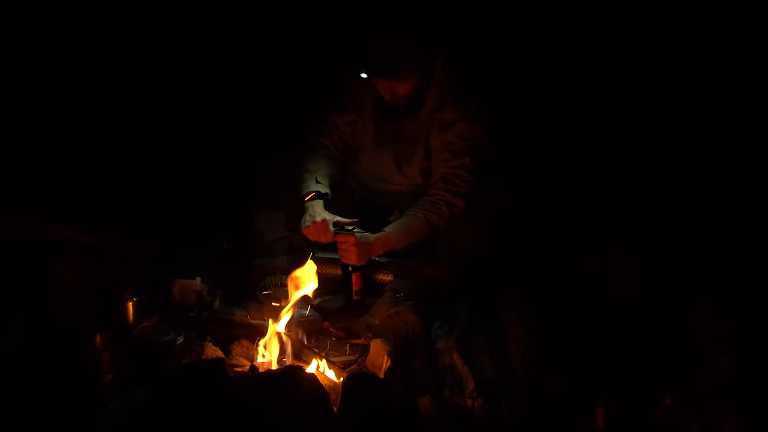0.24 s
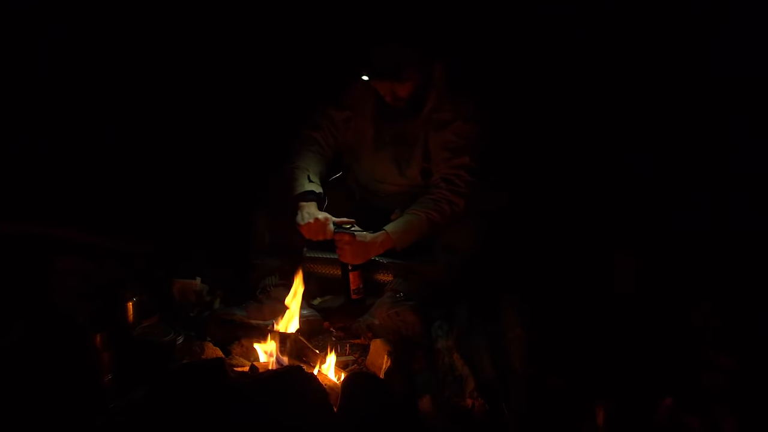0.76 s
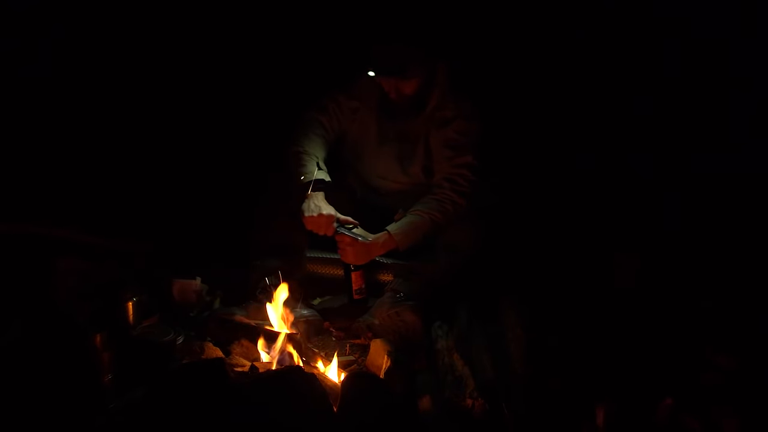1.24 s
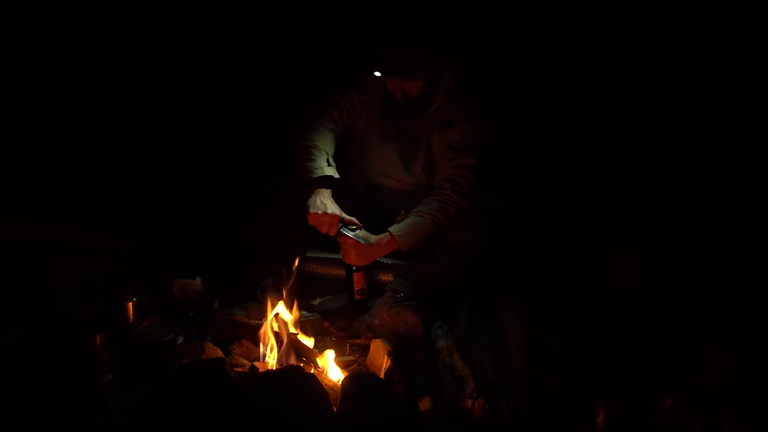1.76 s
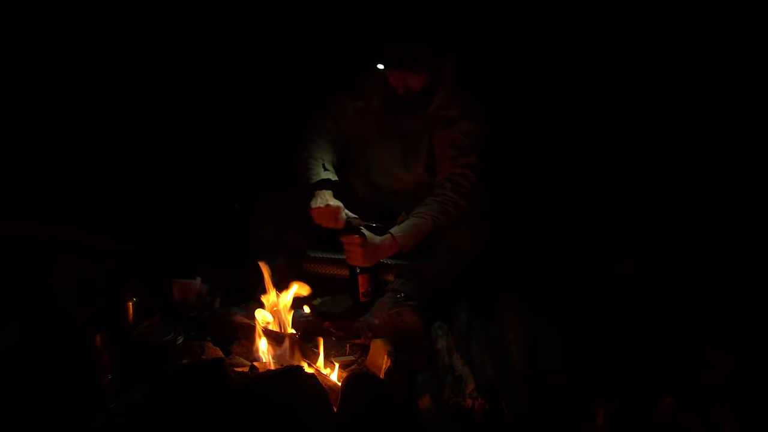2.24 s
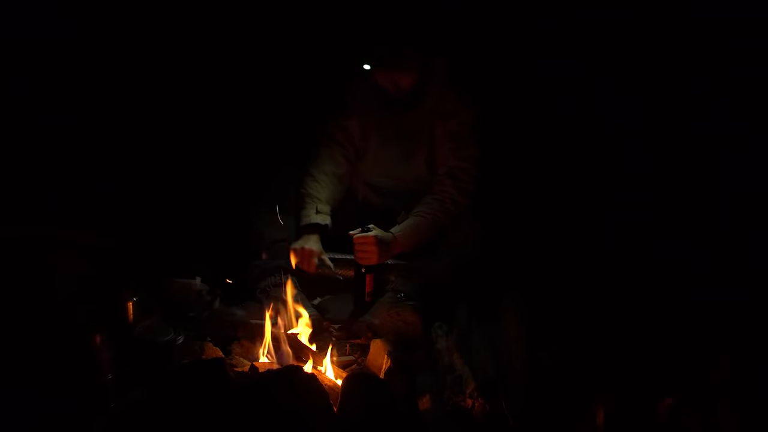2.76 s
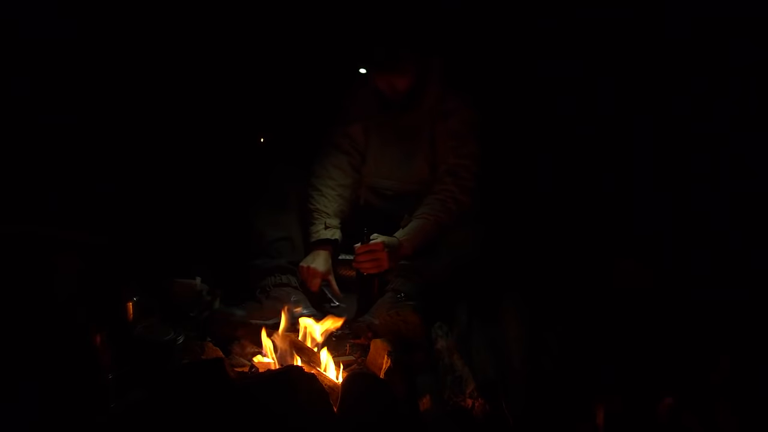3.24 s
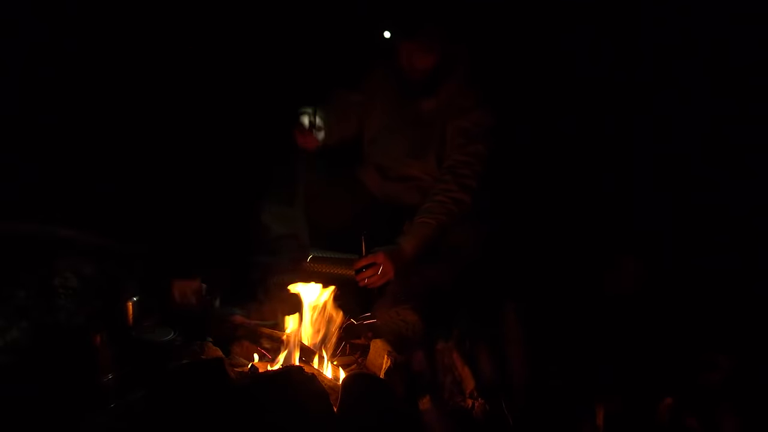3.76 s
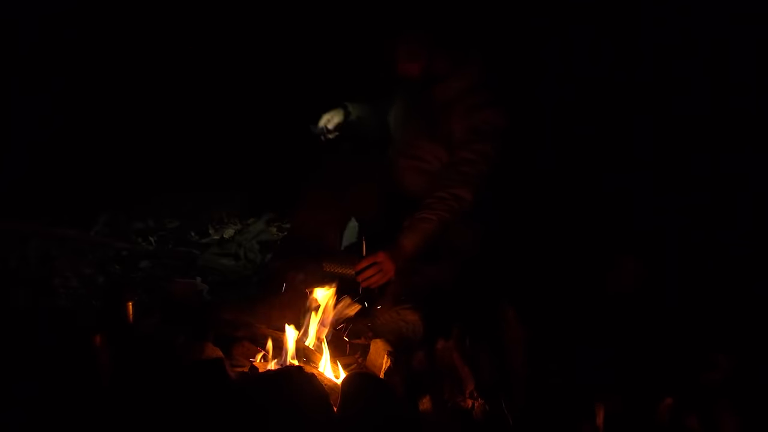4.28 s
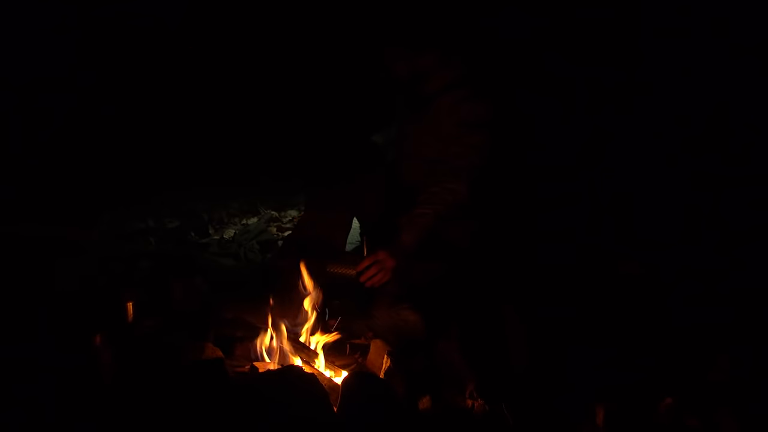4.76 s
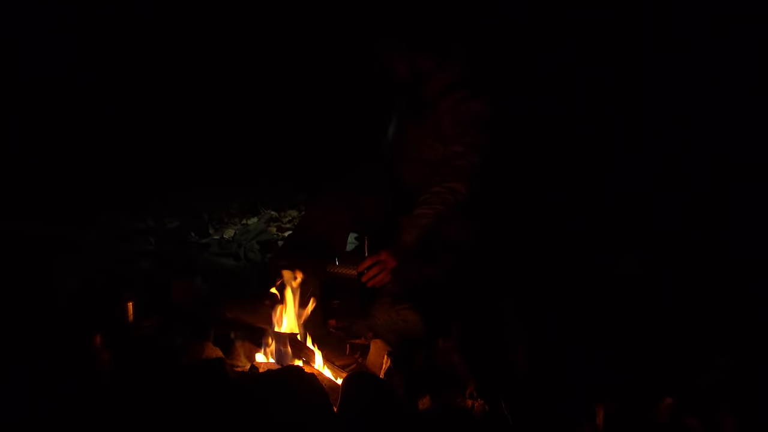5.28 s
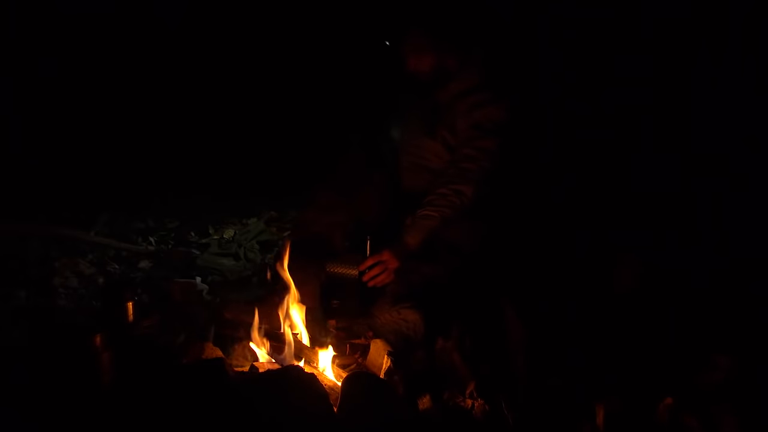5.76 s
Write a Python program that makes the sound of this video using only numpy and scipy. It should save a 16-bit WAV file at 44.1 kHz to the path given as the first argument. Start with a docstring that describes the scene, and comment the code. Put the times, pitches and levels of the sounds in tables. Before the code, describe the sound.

Two sharp metal-on-glass clinks, a quick spit of gas, a loud cap pop and a light metallic scatter of bounces. Fire ticks and hisses throughout, with dry snaps, one explosively loud after four seconds. Cloth rustles in the middle, then a burst of woody knocks and dragging ends the action. Dry open air at night, little echo, low wind buffeting the close small microphone.

```python
"""A campfire at night: a steel tool knocks and pries at a bottle cap, gas hisses, the cap pops off and bounces.
The fire snaps, a stick knocks and drags over wood, a jacket rustles, breeze rumbles on a small microphone.
Blows are a sharp front and short noise, most with decaying modes of what is struck.
Gas, cloth and the fire's hiss are coloured noise with wandering level; near echoes follow the blows,
and the loudest peaks clip."""
import sys
import numpy as np
from scipy import signal
from scipy.fft import rfft, irfft, next_fast_len
from scipy.io import wavfile
from scipy.ndimage import uniform_filter1d

SR = 44100
rng = np.random.default_rng(int(sys.argv[2]) if len(sys.argv) > 2 else 0)


def natural_amplitude(level_db):
    """Convert a level in decibels to a linear amplitude factor, elementwise."""
    exponent = np.asarray(level_db, float) / 20
    return 10 ** exponent


def master(y):
    """Save y as 16-bit WAV."""
    cut = np.clip(np.atleast_2d(y).T, -1, 1)
    pcm = np.round(cut * 32767)  # scale
    wavfile.write(sys.argv[1], SR, pcm.astype(np.int16))


N = 265261
T = np.arange(N) / SR
SPAN = 1 << 15  # samples in one blow


def shape(table, size, tilt_db=0.):
    """Spectral envelope: gain per FFT bin from (Hz, dB) points, tilted in dB per octave about 3 kHz."""
    hz, db = np.transpose(table)
    octave = np.log2(np.maximum(np.fft.rfftfreq(size, 1 / SR), 10))
    tilt = tilt_db * (np.clip(octave, 7, 14) - np.log2(3000))
    return natural_amplitude(np.interp(octave, np.log2(hz), db) + tilt)


def noise(table, tilt_db=0.):
    """Filtering of white noise: coloured noise of rms 1."""
    size = next_fast_len(N)
    spectrum = rfft(rng.standard_normal(size)) * shape(table, size, tilt_db)
    x = irfft(spectrum, size)[:N]
    return x / x.std()


def walk(rate):
    """Random modulation: levels held 1 / rate s and slewed twice, with a spread near 1."""
    hold = int(SR / rate)
    steps = np.repeat(rng.standard_normal(N // hold + 1), hold)
    return 1.57 * uniform_filter1d(uniform_filter1d(steps, hold), hold)[:N]


def curve(rows, edge=0.057):
    """Amplitude envelope: gain over time from (s, dB) rows, faded out over edge seconds beyond them."""
    s, db = np.transpose(rows)
    fade = np.clip(np.minimum(T - s[0], s[-1] - T) / edge + 1, 0, 1)
    return fade * natural_amplitude(np.interp(T, s, db))


def arch(hz, centre, curve_db, low_share=0.52):
    """Parabolic resonance curve: loss in dB about a centre in octaves over 1 kHz, scaled by low_share below it."""
    octaves_off = np.log2(np.maximum(hz, 20) / 1000) - centre
    return -np.abs(curve_db) * octaves_off ** 2 * np.where(octaves_off < 0, low_share, 1)


def causal(gain):
    """Causality: the minimum-phase spectrum of a gain, so nothing sounds before the blow."""
    cepstrum = irfft(np.log(gain))
    half = len(cepstrum) // 2
    cepstrum[1:half] *= 2
    cepstrum[half + 1:] = 0
    return np.exp(rfft(cepstrum))


def ring(modes, centre, curve_db):
    """Modal superposition: one impulse starts decaying sines; the spot struck favours those near the centre."""
    hz, db, t60 = np.array(modes).T[:, :, None]
    t = np.arange(SPAN) / SR
    envelope = natural_amplitude(db + arch(hz, centre, curve_db) - 60 * t / t60)
    return np.sum(envelope * np.sin(2 * np.pi * hz * t), axis=0)


# Colour of a bare crack. Each row: frequency in Hz, gain in dB before any tilt or arch.
CRACK_COLOUR = [(200, 11), (700, 7), (1500, 0), (3000, 3.5), (5500, 2.5), (8000, 9), (10000, -2.5),
                (12500, 0.5), (16000, -4)]


def blows(events, bodies, first_db, crack_curve_db, ring_curve_db, low_share, landing=False):
    """Impact excitation: a sharp front and a dying chatter, plus the modes of what is struck.
    Each event: s, dB, crack T60 s, crack centre in octaves over 1 kHz, a ring dB per body, ring centre."""
    out = np.zeros(N + SPAN)
    t, hz = np.arange(4096) / SR, np.fft.rfftfreq(SPAN, 1 / SR)
    chatter = rng.standard_normal((len(events), len(t)))
    for (s, db, t60, centre, *ring_levels, ring_centre), grains in zip(events, chatter):
        push = grains * natural_amplitude(-60 * (t / max(t60, .003)) ** 1.04)  # at most 93 ms of noise
        push[0] = -natural_amplitude(first_db)
        loss_db = arch(hz, centre, crack_curve_db, max(low_share, 0))
        colour = shape(CRACK_COLOUR, SPAN) * natural_amplitude(np.maximum(loss_db, -80))
        crack = irfft(rfft(push, SPAN) * causal(colour))
        crack = crack / np.linalg.norm(crack[:200]) * 4
        body = sum(natural_amplitude(level) * ring(modes, ring_centre, ring_curve_db)
                   for level, modes in zip(ring_levels, bodies))
        later = [event[0] - s for event in events if event[0] > s + .015]
        if landing and later:  # a landing over 15 ms on stills the ring, at 3000 dB per s
            body *= natural_amplitude(-3000 * np.maximum(np.arange(SPAN) / SR - later[0], 0))
        start = int(s * SR)
        out[start:start + SPAN] += natural_amplitude(db) * (crack - body)
    return out[:N]


# Tool on cap and glass; a loose grip lets the tool ring. Each row: start in seconds, blow level in dB,
# crack T60 in seconds, tool ring in dB against the blow level, spot struck (ring centre in octaves over 1 kHz).
PRIES = [(.103, -37, 0.012, -33, 2.6), (.1128, -9, .045, -23, 2.8), (0.3553, -31.5, 0.019, -28, 1.2),
         (0.7386, -3, .006, -19.5, 1.67), (.756, -29, .02, -5, 1), (.874, -36, .015, -20, 2.1),
         (.9185, -32, .017, -10, 2.2), (1.108, -31.5, 0.037, -15, 1.2), (1.967, -34, .03, -32, 3)]
# Modes of the steel tool and of the glass bottle. Each row: frequency in Hz, level in dB
# before the spot struck weights it, T60 in seconds.
TOOL_MODES = [(2331, -7, .5), (4127, -10, .3), (5280, -22, .12), (6055, -26, .15), (7857, -17, .1)]
BOTTLE_MODES = [(1530, 7, 0.025), (2737, 3, 0.022), (3140, -8.5, 0.033), (3586, -0.5, 0.023),
                (5235, -3.5, 0.021), (6953, -4, 0.029), (7730, -13, .05)]
# The cap lets go: first row the rim tearing free, second the air in the neck. Each row: start in seconds,
# blow level in dB, crack T60 in seconds, crack centre in octaves over 1 kHz, ring in dB against the blow level.
RELEASE = [(1.9704, 10.5, 0.032, 1.37, -16.5), (1.9702, -5, .0067, .013, 0.5)]
# Modes of the air in the neck, rim and freed cap. Each row: frequency in Hz, level in dB
# before the ring centre weights it, T60 in seconds.
NECK_MODES = [(1238, 0, .095), (6050, -24, .25), (6955, -7, .045), (7857, -7, .12), (8890, -17, .1),
              (9285, -14, .08), (11400, -17, .06), (12700, -11, .06)]


def opening():
    """Impact and release: the tool pries, the rim tears free and jolts the tool, the neck pops, the cap chatters."""
    crack_oct, bottle_db = 1.26, -8  # octaves over 1 kHz; dB against the blow level
    pries = [(s, db, t60, crack_oct, tool_db, bottle_db, spot) for s, db, t60, tool_db, spot in PRIES]
    tear, pop = [[(*row, .3)] for row in RELEASE]  # ring centre .3 octaves over 1 kHz
    rattle = [(1.985, -13, 0.23, 1.8, 0)]  # chatter along the rim: a noise burst without modes
    out = blows(pries, [TOOL_MODES, BOTTLE_MODES], first_db=8.0, crack_curve_db=4.6,
                ring_curve_db=5, low_share=0.8)
    out += blows(tear, [TOOL_MODES], first_db=1.3, crack_curve_db=2.2, ring_curve_db=3.5, low_share=1.0)
    out += blows(pop, [NECK_MODES], first_db=6, crack_curve_db=4.6, ring_curve_db=0.033, low_share=0.3)
    return out + blows(rattle, [], first_db=-1, crack_curve_db=4.3, ring_curve_db=0, low_share=0.59)


# Spectrum of the escaping gas. Each row: frequency in Hz, relative spectral level in dB before any tilt.
JET = [(880, -44), (1500, -22), (2220, -24), (2520, -8.5), (3480, -16), (4760, -10), (5190, -6),
       (5670, -9.5), (7910, -0.5), (8390, 5.5), (9160, -2), (12400, 3), (15500, -3)]


def gas():
    """Turbulent jet: bright and sputtering, it builds once the rim lifts and dies as the pressure drops."""
    opens_s, peak_s, peak_db = 1.044, 1.1606, -19.5  # peak before the sputter
    rise_db_per_s, fall_db_per_s = 183, 160
    bright = noise(JET) * natural_amplitude(1.1 * walk(59.8) + 1.8 * walk(460))
    dull = natural_amplitude(-8) * noise(JET, -1.8)
    loss_db = np.maximum(rise_db_per_s * (peak_s - T), fall_db_per_s * (T - peak_s))
    lifted = np.clip((T - opens_s) / 0.0089 + 1, 0, 1)  # fully open at opens_s
    return lifted * natural_amplitude(peak_db - loss_db) * (bright + dull)


# Loose cap on stones. Each row: start in seconds, blow level in dB, crack T60 in seconds,
# ring in dB against the blow level, part struck (ring centre in octaves over 1 kHz).
BOUNCES = [(2.028, -26, .008, -40, 2.5), (2.057, -10.5, 0.016, -33, 3.2), (2.0665, -11, .015, -16.5, 3.7),
           (2.072, -13, 0.011, -10, 2.3), (2.099, -10.5, 0.036, -36, 2.2), (2.103, -25, .02, -32, 3.55),
           (2.1475, -25, .02, -23, 3.4), (2.155, -22.5, 0.012, -30, 3), (2.204, -34, .03, -30, 2.7),
           (2.2328, -12.5, .008, -22, 2.9), (2.375, -35, .02, -22, 2.5)]
# Modes of the cap. Each row: frequency in Hz, level in dB before the part struck weights it,
# T60 in seconds while no landing stills it.
CAP_MODES = [(4680, -2, .1), (6270, 11, .0081), (7740, -3, .08), (7870, 1, .09), (11400, -4, .06),
             (12000, -9, .07), (13600, -1, .1)]


def cap():
    """Contact damping: the loose cap bounces, and landings still the ring of earlier ones."""
    crack_oct = 2.39  # over 1 kHz
    rows = [(s, db, t60, crack_oct, ring_db, part) for s, db, t60, ring_db, part in BOUNCES]
    return blows(rows, [CAP_MODES], first_db=4.1, crack_curve_db=4.7, ring_curve_db=30,
                 low_share=0.52, landing=True)


# Burning wood snaps. Each row: start in seconds, blow level in dB, crack T60 in seconds,
# crack centre in octaves over 1 kHz.
SNAPS = [(0.179, -36, 0.021, 2), (1.3445, -37, .022, 6), (1.362, -26.5, 0.018, 1.5),
         (1.3947, -3.5, 0.0044, 2), (1.51, -8.5, 0.0092, 3), (1.768, -22, 0.024, 5),
         (1.781, -32, 0.0086, 2), (2.615, -19.5, .02, 2.5), (2.89, -27, .022, 13), (3.2933, -36, 0.025, 9),
         (3.438, -3, 0.0086, 0.18), (3.657, -31, 0.043, -3), (3.7012, -5, 0.009, 2.5),
         (4.199, 10.5, 0.011, 2), (4.211, -7, 0.094, 5.5), (4.447, -24.5, .017, 0),
         (4.575, -21.5, 0.018, 14), (4.686, -25, 0.02, 7.5), (5.0947, -33.5, .012, 3.5)]
# Modes of the log. Each row: frequency in Hz, level in dB before the ring centre weights it, T60 in seconds.
LOG_MODES = [(120, -14, .04), (270, -7, .03), (745, -2, 0.013), (1327, 1.5, 0.012), (1480, -5, 0.013),
             (2420, -6, 0.012), (3760, -12, .0067), (5530, 4, .01), (6560, -13, .02), (8200, 4, .012)]


def snaps():
    """Sudden fracture: snaps ring the log; dull ones come from thick wood and ring it more."""
    ring_db, ring_db_per_oct, ring_oct = -8.5, -3.5, 0.8
    rows = [(s, db, t60, centre, ring_db + ring_db_per_oct * max(centre, 0), ring_oct)
            for s, db, t60, centre in SNAPS]
    return blows(rows, [LOG_MODES], first_db=15.8, crack_curve_db=2.05, ring_curve_db=13.0, low_share=0.22)


# Stick knocks. Each row: start in seconds, blow level in dB, crack T60 in seconds,
# spot struck (ring centre in octaves over 1 kHz).
KNOCKS = [(5.209, -14.5, 0.06, -1.1), (5.2838, -25, 0.035, 1), (5.311, -25.5, 0.024, 1.2),
          (5.349, -27.5, 0.14, 1.6), (5.40, -25, 0.069, 1.7), (5.426, -34, .02, 4),
          (5.4638, -11, 0.091, -0.63), (5.5325, -13, 0.0057, 0.2), (5.539, -13.5, 0.01, 1.76),
          (5.5835, -17, .014, 0.8), (5.589, -16, 0.072, -0.06), (5.6115, -16.5, 0.014, 1.2),
          (5.62, -14, 0.066, 0.1), (5.635, -5, 0.028, 1.04), (5.643, -14, .09, 0.5), (5.69, -29, .04, 5),
          (5.721, -23.5, 0.16, -1)]
# Modes of the stick. Each row: frequency in Hz, level in dB before the ring centre weights it, T60 in seconds.
STICK_MODES = [(420, 6, 0.01), (556, -63, 0.021), (720, -17, 0.15), (804, 2, 0.062), (1050, 4, 0.0073),
               (1465, 1, 0.04), (2503, 0, 0.032), (2930, -9, .035), (3210, -6, 0.039), (3700, -14, .03)]


def knocks():
    """Modal selection by strike position: the spot struck sets both the crack and the ring of the stick."""
    crack_oct, follow, ring_db = 0.28, 0.74, -1.5  # the crack centre follows the spot in part
    rows = [(s, db, t60, crack_oct + follow * spot, ring_db, spot) for s, db, t60, spot in KNOCKS]
    return blows(rows, [STICK_MODES], first_db=13.0, crack_curve_db=2.43, ring_curve_db=48.0, low_share=0.65)


# Stick dragged over wood. Each row: time in seconds, level in dB before the grains and ring scale it.
DRAG = [(5.26, -49.5), (5.32, -40), (5.42, -41), (5.5, -47), (5.61, -37.5), (5.72, -39.5), (5.77, -47)]


def drag():
    """Stick-slip friction: grains ring the stick over a hiss; the ring fades as the grip tightens."""
    grains = rng.standard_normal(N) * natural_amplitude(5.1 * walk(90) + 1.7 * walk(600))
    rung = signal.fftconvolve(grains, ring(STICK_MODES, 1.0, 0.95))[:N]
    ring_gain = natural_amplitude(6.5 - 22 * np.maximum(T - DRAG[0][0], 0))  # dB at the start, dB per s
    hiss = noise(CRACK_COLOUR, -2.16) * natural_amplitude(3.7 * walk(140))
    return curve(DRAG) * (ring_gain * rung / rung.std() + hiss)


def swell(s, db, rise_s, fall_s):
    """Gaussian envelope: a rounded rise and fall, 24 dB down a rise before and a fall after its peak."""
    reach = (T - s) / np.where(T < s, rise_s, fall_s)
    return natural_amplitude(db + np.maximum(-24 * reach ** 2, -120))


# Jacket moving. Each row: loudest moment in seconds, level in dB before the flutter,
# rise in seconds, fall in seconds, brightness from 0 to 1.
RUSTLE = [(.57, -50.5, 0.64, 0.24, 0.7), (2.9, -39, 0.43, 0.48, 0.62), (3.51, -45, 0.045, .05, 0.63),
          (4.09, -42.5, 0.14, 0.28, 0.94), (4.24, -40, 0.024, 0.16, 0.56), (4.45, -36.5, 0.24, 0.27, 0.7),
          (5.9, -52, 0.19, 0.35, 0.65)]
# Spectrum of the cloth. Each row: frequency in Hz, relative spectral level in dB before the tilt.
CLOTH = [(240, -41), (400, -8), (928, 0.5), (1560, 0), (1790, -6), (2510, -2), (4850, -8), (5830, -11),
         (7110, -10.5), (8160, -9), (9960, -27.5), (12700, -20), (15500, -30)]
# Spectrum of the sleeve's swish. Each row: frequency in Hz, relative spectral level in dB.
SWISH_BAND = [(6000, -38), (7300, -32), (8100, 10), (8800, -1), (10000, -35)]


def jacket():
    """Dense fabric friction: each move mixes dull and bright noise; a sliding sleeve gives a thin swish."""
    dull, bright = noise(CLOTH, -7.0), noise(CLOTH, 2.9)
    out = swell(4.495, -38, rise_s=0.069, fall_s=0.061) * noise(SWISH_BAND)
    for *move, brightness in RUSTLE:
        angle = np.pi / 2 * np.clip(brightness, 0, 1)
        out = out + swell(*move) * (dull * np.cos(angle) + bright * np.sin(angle))
    return out * natural_amplitude(0.4 * walk(60) + 1.1 * walk(430))


# Soft dull taps on the ground. Each row: start in seconds, blow level in dB, crack T60 in seconds,
# crack centre in octaves over 1 kHz.
TAPS = [(1.713, -23.5, 0.02, -0.63), (2.149, -19.5, 0.016, 0.39), (3.2056, -19.5, 0.024, -0.9),
        (3.353, -27, .015, -0.66), (3.45, -36, 0.016, -0.58)]


def taps():
    """Heavily damped impact: short muffled bumps without a ring."""
    rows = [(*row, 0) for row in TAPS]
    return blows(rows, [], first_db=5.2, crack_curve_db=4.5, ring_curve_db=0, low_share=1.0)


def crackle(rate, centre, db):
    """Random impulse train: tiny dry ticks of embers, short noise bursts at about rate per second."""
    sparks = (rng.random(N) < rate / SR) * natural_amplitude(3.5 * rng.exponential(size=N))
    burst = signal.lfilter([1], [1, -natural_amplitude(-60 / (0.013 * SR))], sparks)  # T60 13 ms
    colour = natural_amplitude(arch(np.fft.rfftfreq(N, 1 / SR), centre, 5.9))
    return natural_amplitude(db) * irfft(rfft(burst * rng.standard_normal(N)) * colour, N)


# Spectrum of the fire's hiss. Each row: frequency in Hz, relative spectral level in dB.
NIGHT = [(88, -0.5), (150, -5), (302, -5), (404, -8.5), (510, -9), (781, -7.5), (828, -7), (1950, -18.5),
         (2460, -19), (3160, -20.5), (6360, -25.5), (7570, -24.5), (15500, -31.5)]
# Breeze on the microphone. Each row: time in seconds, level in dB before the buffeting.
BREEZE = [(0.0, -40.5), (.27, -38.5), (.6, -46), (1.3, -44.5), (2.1, -40.5), (3.6, -45.5), (4.3, -38.5),
          (5.0, -43), (5.6, -52), (6.01, -49.5)]
# Spectrum of the breeze rumble. Each row: frequency in Hz, relative spectral level in dB.
RUMBLE = [(8.8, -44), (15, 2.5), (43, -5), (107, -5), (145, -10.5), (247, -12.5), (288, -15.5), (400, -26),
          (520, -31), (880, -120)]


def night():
    """Band-wise modulated noise: fire hiss flickers by octave, with tiny ticks, over buffeting breeze rumble."""
    hz = np.fft.rfftfreq(N, 1 / SR)
    bed = rfft(noise(NIGHT))
    slow = .6 * walk(0.666)  # shared by all bands
    hiss = 0
    for low in 125 * 2 ** np.arange(8):
        band = irfft(bed * (hz >= low) * (hz < 2 * low), N)
        hiss = hiss + natural_amplitude(1.8 * slow + 0.28 * walk(11)) * band
    ticks = crackle(10, 2.4, -44) + crackle(13, -0.22, -32)
    buffet = natural_amplitude(2.5 * walk(18))
    return natural_amplitude(-44.5) * hiss + ticks + curve(BREEZE) * buffet * noise(RUMBLE)


# Echoes of ground, stones and legs. Each row: delay in seconds, level in dB against the direct sound.
ECHOES = [(.0035, -16), (0.015, -48), (0.022, -70)]


def scene():
    """Reflection and scattering: all blows share the near echoes and a short scatter from the undergrowth."""
    t = T[:SPAN // 2]
    space = natural_amplitude(-39.5 - 60 * t / 0.084) * rng.standard_normal(len(t))  # T60 84 ms
    space = signal.lfilter([1], [1, -.45], space)  # leaves swallow the treble
    space[0] = 1  # direct sound
    for s, db in ECHOES:
        space[int(s * SR)] += natural_amplitude(db)
    hits = opening() + cap() + snaps() + knocks() + taps()
    return (signal.fftconvolve(hits, space)[:N] + gas() + drag() + jacket() + night())[None]


def band_limit(x):
    """A steep low-pass at the top of the band."""
    return signal.sosfilt(signal.butter(12, 15680, fs=SR, output="sos"), x)


def record(dry):
    """Overload: the loudest peaks clip flat."""
    clipped = np.clip(dry, -1, 1)
    return band_limit(clipped)


dry = scene()
out = record(dry)
master(out)
```